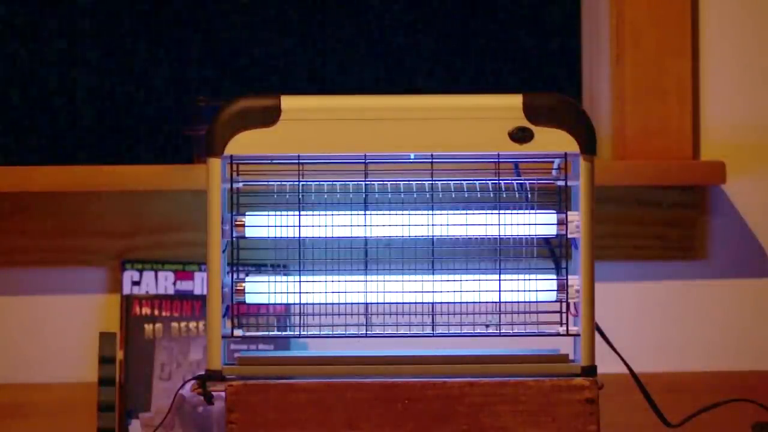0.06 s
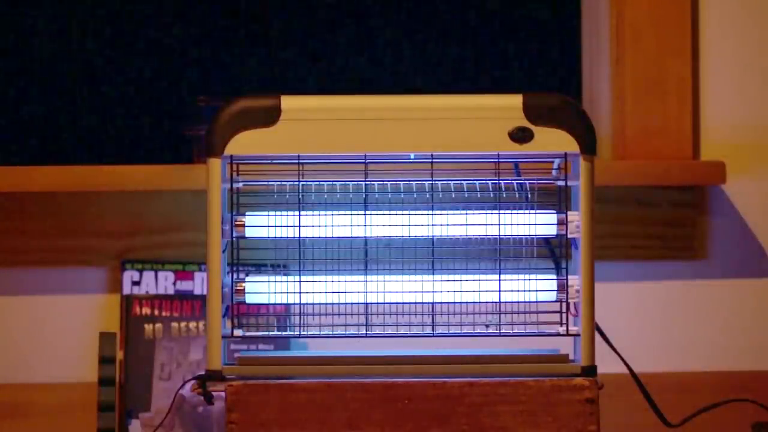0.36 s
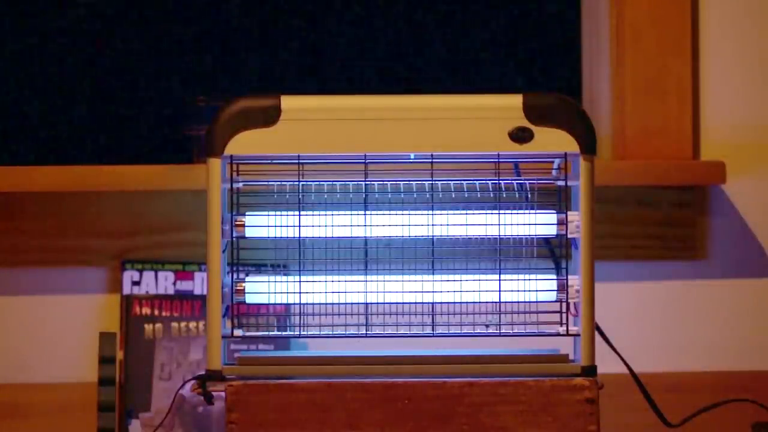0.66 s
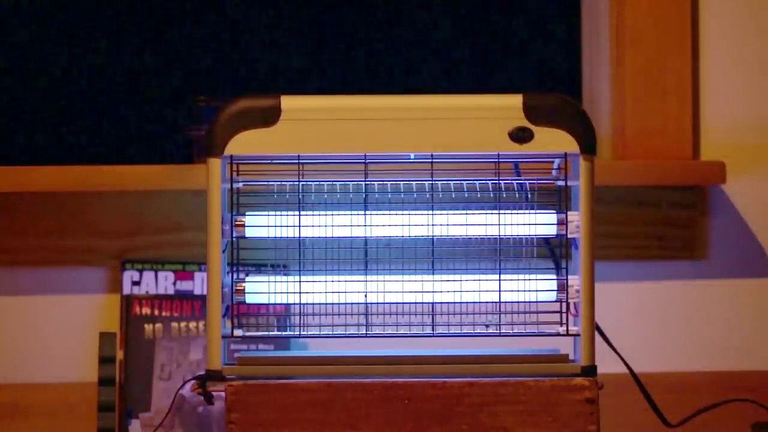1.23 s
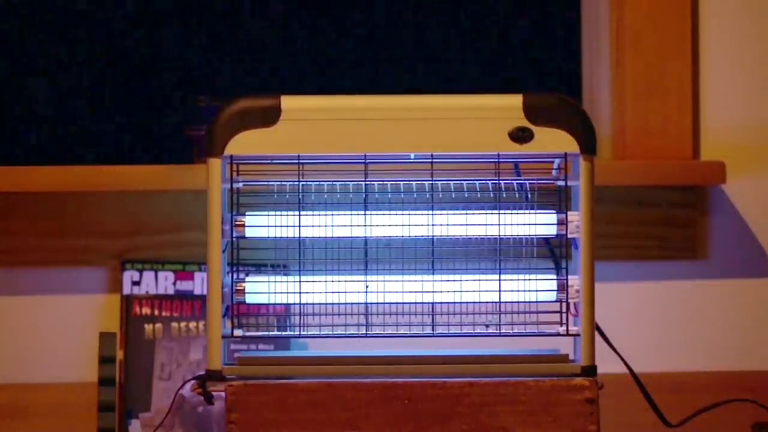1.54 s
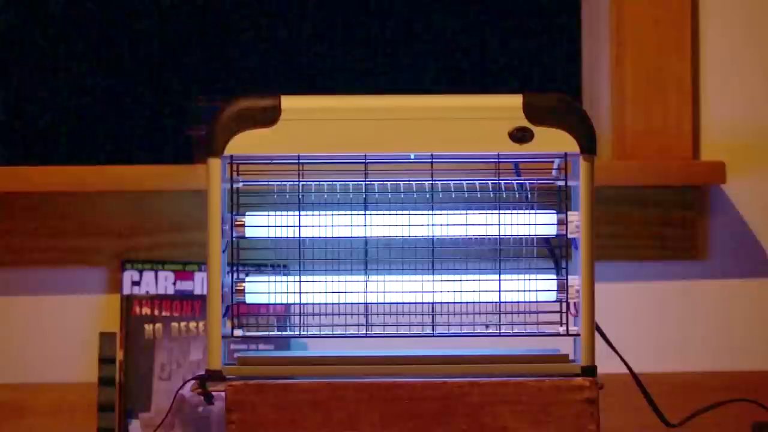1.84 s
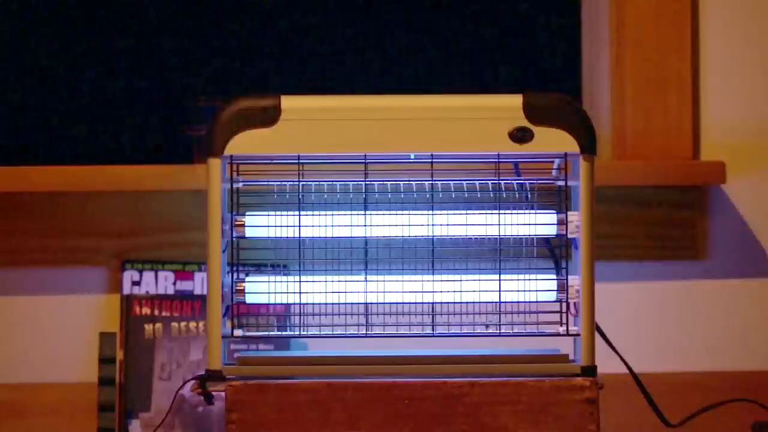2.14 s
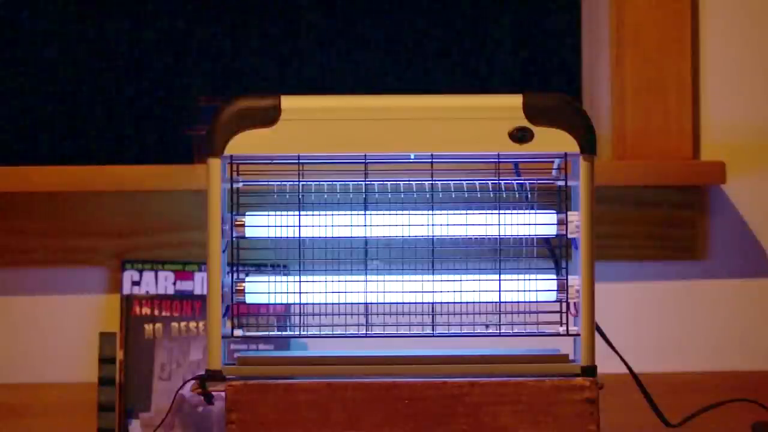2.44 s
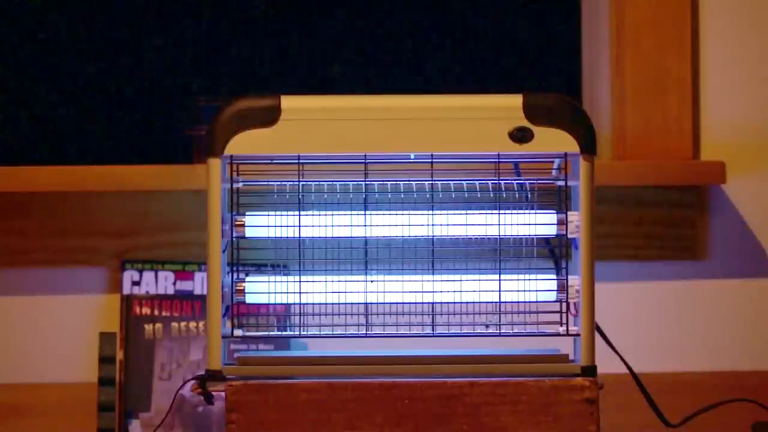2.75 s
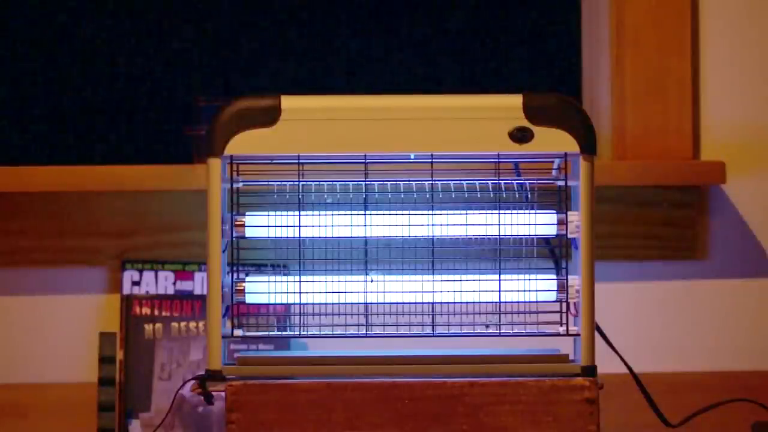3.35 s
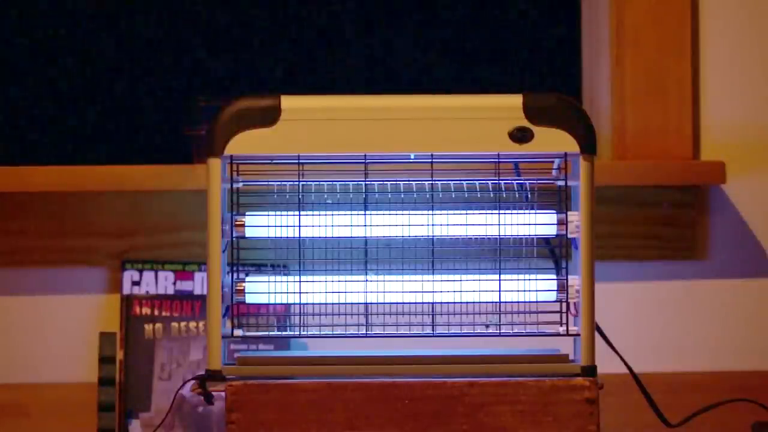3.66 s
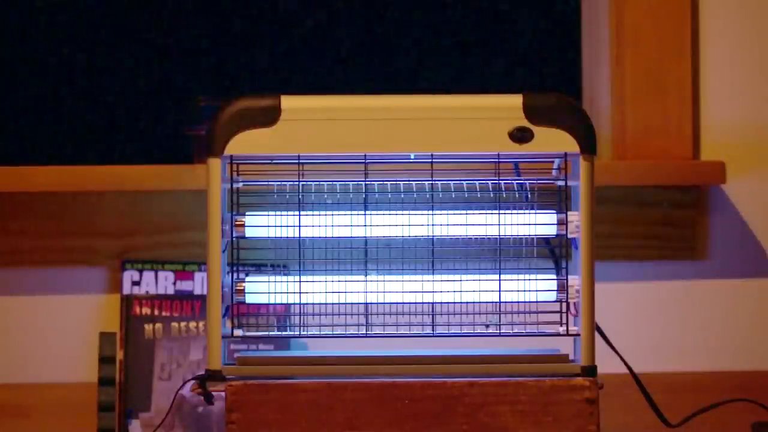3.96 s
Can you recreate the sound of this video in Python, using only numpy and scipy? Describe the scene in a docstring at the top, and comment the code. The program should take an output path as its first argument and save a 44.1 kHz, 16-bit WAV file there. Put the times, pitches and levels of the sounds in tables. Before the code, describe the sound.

One loud spark crack from a bug zapper over faint hiss, followed by small ticks.

```python
"""An electric bug zapper in a quiet room. Steady hiss, a faint hum and a thin high whine run throughout.
The housing clicks softly; then an insect sizzles on the grid in tiny discharges. Near 3 s one loud spark
snaps and overloads the microphone. The limiter ducks, and as it recovers the bright reverberation of the
room swells back, while a grid wire rings faintly on. A few dry ticks and a little more sizzle follow."""
import sys
import numpy as np
from scipy import signal
from scipy.fft import rfft, irfft
from scipy.io import wavfile
from scipy.ndimage import uniform_filter1d

SR = 44100
rng = np.random.default_rng(int(sys.argv[2]) if len(sys.argv) > 2 else 0)


def wav_record(signal):
    """Record a signal, one row per channel, as 16-bit PCM in the file named by sys.argv[1]."""
    frames = np.transpose(np.atleast_2d(signal))
    bounded = np.clip(frames, -1, 1)
    # unit amplitude maps onto the largest positive 16-bit level
    quanta = np.round(bounded * 32767).astype(np.int16)
    wavfile.write(sys.argv[1], SR, quanta)


N = 176400
T = np.arange(N) / SR
BIN_HZ = np.fft.rfftfreq(N, 1 / SR)
SNAP_S, BAND_LIMIT_HZ = 2.9475, 15900


def amp(db):
    """Decibels to amplitude ratio."""
    return 10 ** (np.asarray(db) / 20)


def unit_rms(x):
    """Normalisation to an rms of 1."""
    return x / np.sqrt(np.mean(x ** 2) + 1e-20)


def curve_at(points, hz):
    """Interpolation on a logarithmic frequency axis."""
    point_hz, value = np.transpose(points)
    return np.interp(np.log(hz + 1), np.log(point_hz + 1), value)


def shaped(x, gain):
    """Filtering as multiplication of the spectrum, one gain per frequency bin."""
    return irfft(rfft(x) * gain, N)


def noise(spectrum):
    """Spectral shaping: white noise takes on the given colour, at rms 1."""
    return unit_rms(shaped(rng.standard_normal(N), amp(curve_at(spectrum, BIN_HZ))))


def stereo_noise(spectrum, side_spectrum):
    """Partial coherence: the ears share a mid noise and get a weaker side noise in opposite polarity."""
    side = shaped(noise(spectrum), amp(curve_at(side_spectrum, BIN_HZ)))
    return noise(spectrum) + np.array([side, -side])


# bands of hum: pitch_hz, level_db, width_hz
HUM_BANDS = [(152, -75.5, 18), (203, -80, 13), (367, -76.5, 40)]
# spectrum of the hiss: frequency_hz, relative_density_db
HISS_SPECTRUM = [(12, -35.5), (20, -14.5), (83, -6), (112, -9), (148, -1), (180, -8.5), (207, -3.5),
                 (324, -7), (372, -7), (465, -6), (505, -8.5), (1580, -14.5), (2540, -15.5), (13900, -19.5),
                 (15500, -21)]
# stereo width of the hiss: frequency_hz, side_minus_mid_db
HISS_WIDTH = [(60, -11.5), (130, -17.5), (290, -18), (640, -14), (1410, -10), (3100, -7), (6820, -5.5),
              (15000, -3.5)]

def background(whine_hz=15735, whine_db=-72, hiss_db=-60.5):
    """Bandwidth sets timbre: narrow noise is a wavering hum, a pure tone a whine, broad noise a hiss."""
    hum = np.zeros(N)
    for pitch_hz, level_db, width_hz in HUM_BANDS:
        peak = 1 / (1 + (2 * (BIN_HZ - pitch_hz) / width_hz) ** 2)
        hum += amp(level_db) * unit_rms(shaped(rng.standard_normal(N), peak))
    whine = amp(whine_db) * unit_rms(np.sin(2 * np.pi * whine_hz * T))
    hiss = amp(hiss_db) * stereo_noise(HISS_SPECTRUM, HISS_WIDTH)
    return hum + whine + hiss


def decay(start_s, fall_s, hold_s=0):
    """Exponential decay: the envelope jumps to 1, holds, then falls with time constant fall_s."""
    onset = np.clip((T - start_s) * SR, 0, 1)
    return onset * np.exp(-np.maximum(T - start_s - hold_s, 0) / fall_s)


# reverberation time of the room: frequency_hz, t60_s
REVERB_TIMES = [(300, 0.54), (1200, 0.62), (3000, 0.56), (5000, 0.57), (8000, 0.45), (11000, 0.4),
                (15500, 0.32)]

def room_decay(x):
    """Absorption: each frequency band falls 60 dB in its own reverberation time."""
    hz, time_s, bands = signal.stft(x, SR, nperseg=256)
    t60_s = curve_at(REVERB_TIMES, hz)[:, None]
    return signal.istft(bands * amp(-60 * time_s / t60_s), SR, nperseg=256)[1][:N]


def with_room(direct, room_db):
    """Reverberation: the direct sound plus its convolution with the room's impulse response."""
    response = room_decay(rng.standard_normal(SR))
    response /= np.linalg.norm(response)
    return direct + amp(room_db) * signal.fftconvolve(direct, response)[:N]


# spectrum of the housing's click: frequency_hz, relative_density_db
CLICK_SPECTRUM = [(300, -18), (900, -7), (1450, 2), (2200, -13), (3100, -7), (4500, -15), (9000, -11),
                  (16000, -22)]

def housing_click(start_s=1.1425, level_db=-51, rattle_db=-7.5):
    """Damped vibration: the case gives one soft, dull knock and a brief rattle."""
    knock = decay(start_s, fall_s=.0018)
    rattle = amp(rattle_db) * decay(start_s, fall_s=.02)
    return with_room(amp(level_db) * noise(CLICK_SPECTRUM) * (knock + rattle), room_db=-5.5)


# small sparks on the grid: start_s, relative_level_db
GRID_SPARKS = [(2.5726, -48.5), (2.5774, -43.5), (2.603, -41.5), (2.6224, -41.5), (2.716, -40),
               (2.7222, -41.5), (2.7384, -39), (2.7482, -35), (2.7553, -32.5), (2.8025, -39.5),
               (2.8084, -42.5), (2.8154, -42.5), (2.8225, -37.5), (2.826, -39.5), (2.8304, -37),
               (2.8384, -43), (2.8424, -45), (2.9188, -43.5), (3.3313, -35.5)]
# spells of fizz: start_s, length_s, level_db
FIZZ_SPELLS = [(2.597, .06, -63.5), (2.745, 0.066, -58), (2.812, .048, -59), (3.70, 0.037, -63.5),
               (3.895, .028, -57.5), (3.978, 0.033, -52)]
# spectrum of both: frequency_hz, relative_density_db
SIZZLE_SPECTRUM = [(300, -18), (1500, -11), (4000, -9), (6500, -5.5), (9000, 1), (10800, -3),
                   (12500, -14.5), (16000, -13.5)]

def sizzle(spark_gain_db=-4.5, spark_delay_s=.0011, grain_depth_db=4.5):
    """Small discharges where the insect touches the grid: noise modulated into sparks and grainy fizz."""
    sparks = sum(amp(level_db + spark_gain_db) * decay(start_s + spark_delay_s, fall_s=.001)
                 for start_s, level_db in GRID_SPARKS)
    spells = sum(amp(level_db) * np.sin(np.pi * np.clip((T - start_s) / length_s, 0, 1))
                 for start_s, length_s, level_db in FIZZ_SPELLS)
    flicker = unit_rms(uniform_filter1d(rng.standard_normal(N), size=40))
    grain = unit_rms(amp(grain_depth_db * flicker))
    return with_room(noise(SIZZLE_SPECTRUM) * (sparks + spells * grain), room_db=-7.5)


# spectra of the big spark's crack and of its reverberation: frequency_hz, relative_density_db
CRACK_SPECTRUM = [(200, -27), (1300, -18), (2500, -14), (4000, -5), (6000, -2.5), (8700, 1.5), (11000, -2),
                  (16000, -10)]
REVERB_SPECTRUM = [(100, -50.5), (230, -37.5), (400, -24), (700, -21.5), (1300, -15.5), (1800, -11.5),
                   (2500, -8), (4500, -1.5), (8500, 6.5), (11500, 1.5), (16000, -6)]
# stereo width of each: frequency_hz, side_minus_mid_db
CRACK_WIDTH = [(60, -65), (240, -64), (950, -69), (3770, -28), (15000, -30.5)]
REVERB_WIDTH = [(60, -14.5), (240, -25.5), (950, -40.5), (3770, -77), (15000, -71.5)]

def snap():
    """Impulse excitation: the big spark's bright crack sets the room and a grid wire ringing."""
    crack_db, hold_s, fall_s = 1, .0022, .003
    crack = stereo_noise(CRACK_SPECTRUM, CRACK_WIDTH) * decay(SNAP_S, fall_s, hold_s)
    effective_length_s = hold_s + fall_s / 2
    crack_rms = np.sqrt(np.sum(crack[0] ** 2) / SR / effective_length_s)
    crack *= amp(crack_db) / crack_rms

    reverb_db, build_s = -4, .003
    reverb = np.array([room_decay(ear) for ear in stereo_noise(REVERB_SPECTRUM, REVERB_WIDTH)])
    reverb *= amp(reverb_db) * (1 - np.exp(-T / build_s))
    reverb = np.pad(reverb, ((0, 0), (round(SNAP_S * SR), 0)))[:, :N]  # starts at the snap

    wire_hz, wire_db, wire_t60_s = 1336, -66, 4
    wire = amp(wire_db) * decay(SNAP_S, wire_t60_s / np.log(1000)) * np.sin(2 * np.pi * wire_hz * T)
    return crack + reverb + wire


def microphone_thump(delay_s=.00087, width_s=.0007, pitch_hz=850, pulse_db=-13, kick_db=-27.5):
    """Overload: the spark's pressure pulse kicks the microphone one way, and it swings slowly back."""
    from_peak_s = T - SNAP_S - delay_s
    envelope = np.exp(-(from_peak_s / width_s) ** 2)
    pulse = envelope * (amp(pulse_db) * np.cos(2 * np.pi * pitch_hz * from_peak_s) + amp(kick_db))
    bass_cut = signal.butter(2, 16, "high", fs=SR, output="sos")  # 16 Hz; its undershoot is the swing
    return signal.sosfilt(bass_cut, pulse)


def limiter_gain(x, threshold_db=-9, duck_db_per_db=2.09, attack_s=.0018, recovery_s=.079):
    """Automatic gain control: the gain ducks fast when the rms passes a threshold, then climbs linearly."""
    power = uniform_filter1d((x ** 2).mean(0), size=88, origin=43)  # mean over the last 2 ms
    rms = np.sqrt(abs(power) + 1e-12)
    target = np.minimum(amp(threshold_db) / rms, 1) ** duck_db_per_db
    climb = T / recovery_s
    gain = np.minimum.accumulate(target - climb) + climb
    pole = np.exp(-1 / (attack_s * SR))
    return 1 - signal.lfilter([1 - pole], [1, -pole], 1 - gain)


# electrical ticks: start_s, level_db, left_minus_right_db
DRY_TICKS = [(3.7345, -28, -2.5), (3.8553, -24, -2), (3.8830, -25, -7.5), (3.8834, -25.5, -7.5),
             (3.9788, -23.5, 0), (3.9984, -24.5, -2)]

def ticks(low_cut_hz=600):
    """Impulses: sharp, dry electrical ticks, set a little to the right by interaural level difference."""
    impulses = np.zeros((2, N))
    for start_s, level_db, pan_db in DRY_TICKS:
        impulses[:, round(start_s * SR)] += amp([level_db + pan_db / 2, level_db - pan_db / 2])
    impulses *= SR / (2 * BAND_LIMIT_HZ)  # offsets the height an impulse loses to the band limit
    return signal.lfilter(*signal.butter(1, low_cut_hz, "high", fs=SR), impulses)


def scene():
    """Superposition: the zapper's sounds add to the steady background of the room."""
    return snap() + sizzle() + housing_click() + ticks() + background()


def record(dry, ceiling_db=-1):
    """Saturation: the crack outruns the limiter and clips softly; the thump adds; all is low-passed."""
    ceiling = amp(ceiling_db)
    clipped = ceiling * np.tanh(dry * limiter_gain(dry) / ceiling)
    low_pass = signal.firwin(201, BAND_LIMIT_HZ, window=("kaiser", 8), fs=SR)
    return signal.oaconvolve(clipped + microphone_thump(), low_pass[None], "same")


dry = scene()
out = record(dry)
wav_record(out)
```